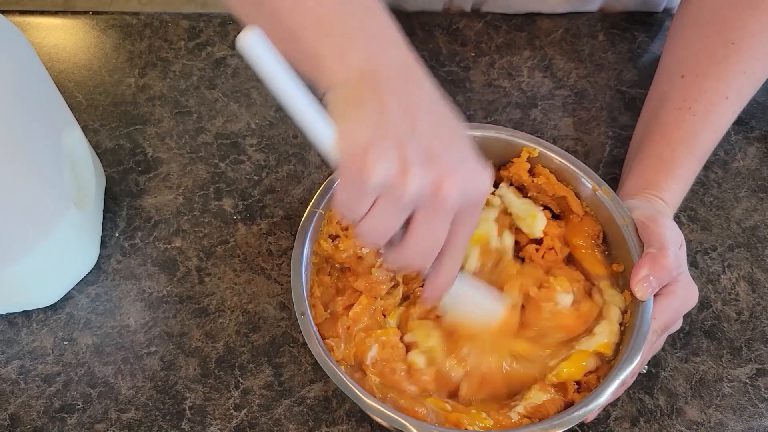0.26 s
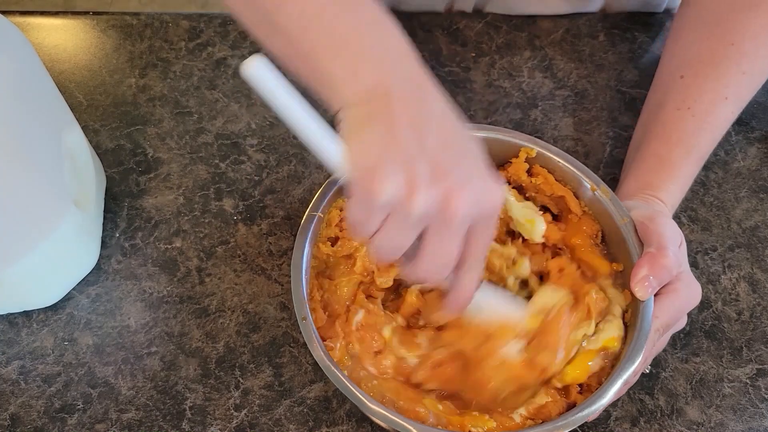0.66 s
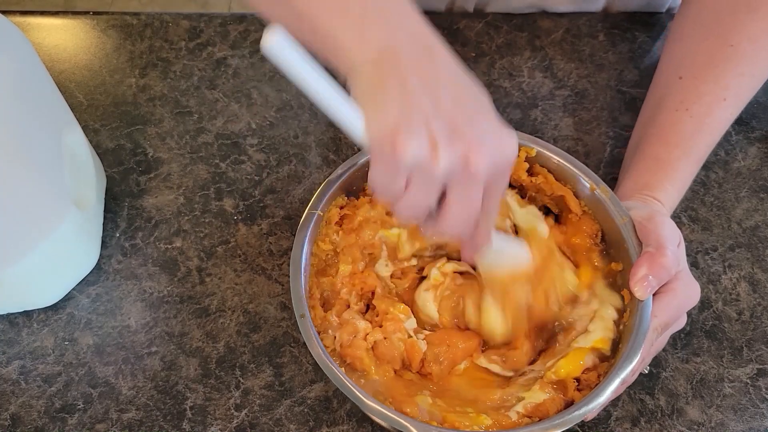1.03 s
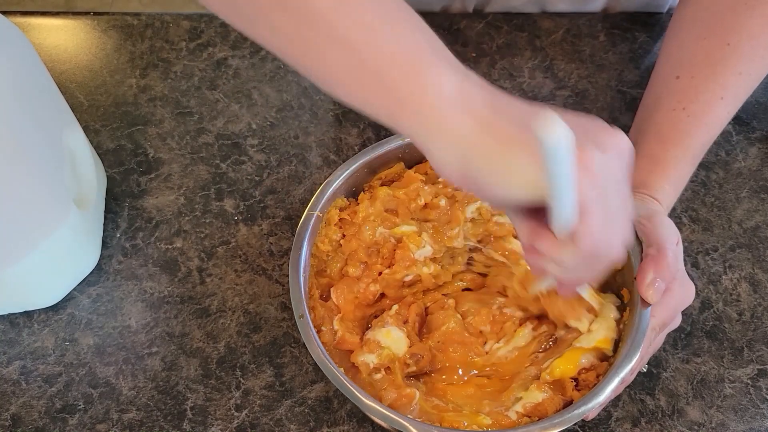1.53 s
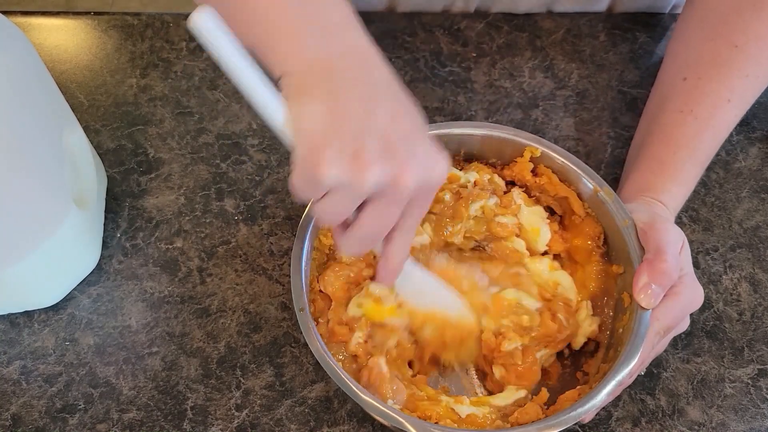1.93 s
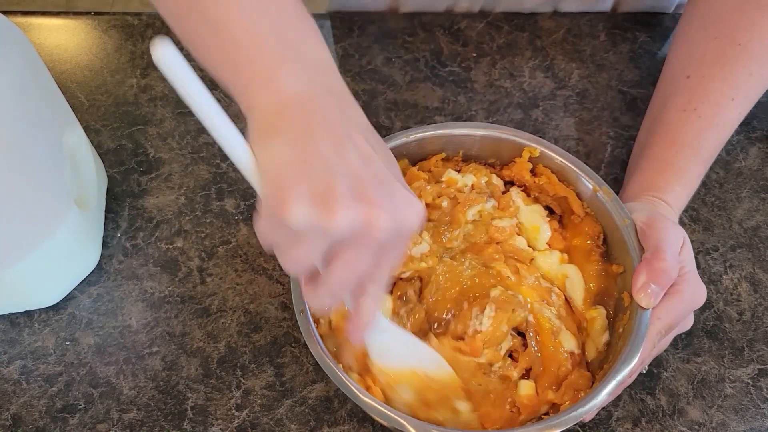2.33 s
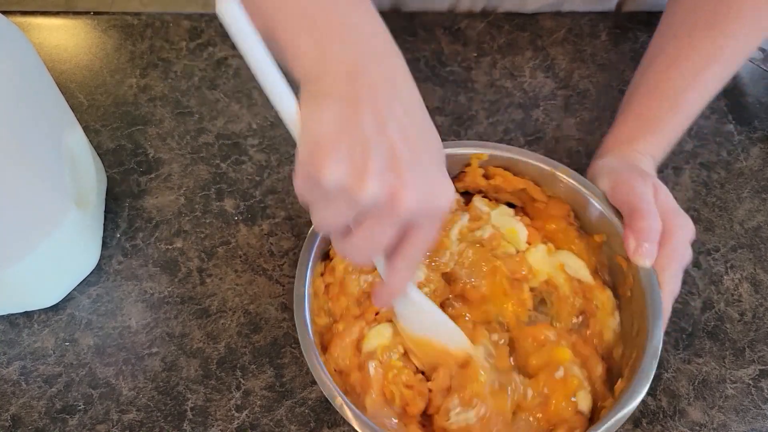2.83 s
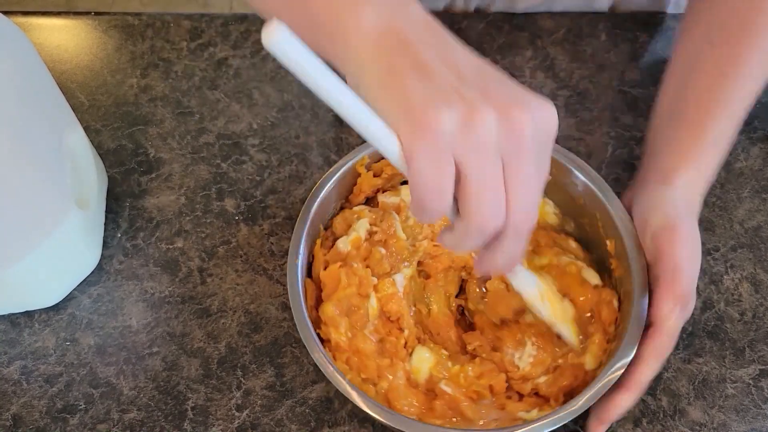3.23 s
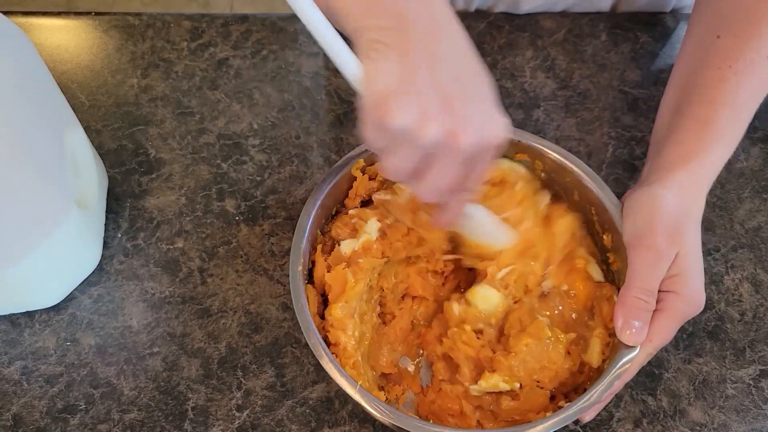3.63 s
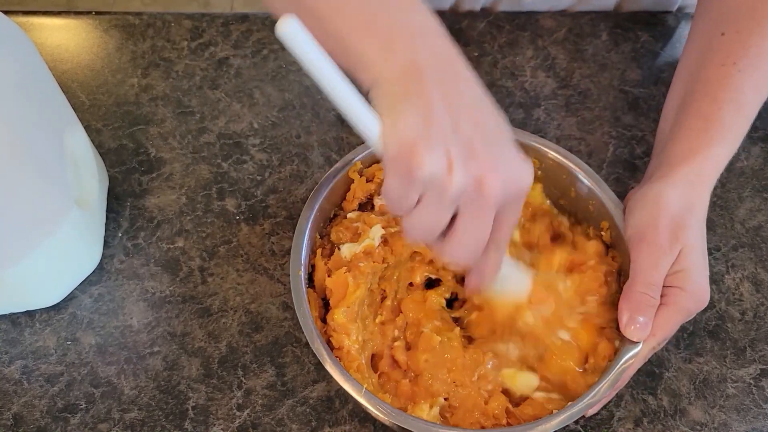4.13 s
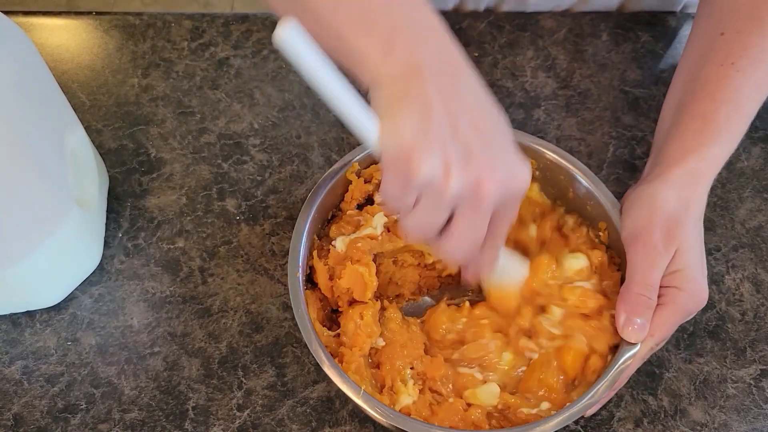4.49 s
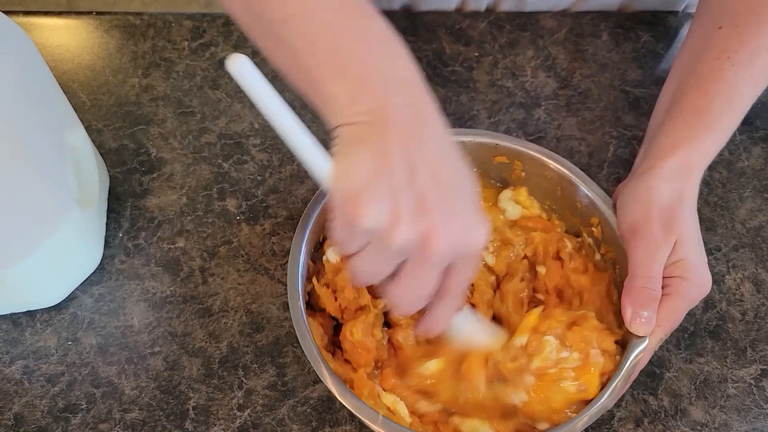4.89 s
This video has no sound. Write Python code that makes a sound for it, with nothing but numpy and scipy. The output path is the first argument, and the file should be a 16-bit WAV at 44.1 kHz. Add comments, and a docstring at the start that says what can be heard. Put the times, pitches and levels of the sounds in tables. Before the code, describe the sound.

Wet mashed sweet potato is stirred briskly in a metal bowl, with sticky squelches, slaps, pops and crackles and a few dull bowl bumps.

```python
"""Wet mashed sweet potato, stirred in a hand-held steel bowl, squelches as swarms of small cavities ring at random.
Each drag of the plastic spatula swells the swarm; wet films tear in a crackle of broad ticks.
Pops, bright film ticks, blade slaps and their echoes are each a snap with a short damped sine; hollows ring and glide.
Smooth force pulses, as dull bumps on the counter and hard strikes of the blade, ring the steel; shaped noise rumbles.
Bowl echoes, treble scatter and a small kitchen's decaying noise tail answer, above a quiet noise floor."""
import sys
import numpy as np
from scipy import signal
from scipy.fft import rfft, irfft
from scipy.io import wavfile

SR = 44100
rng = np.random.default_rng(int(sys.argv[2]) if len(sys.argv) > 2 else 0)


def store_wav(level_fs):
    """Save 16-bit WAV to argv[1]."""
    pcm = np.round(np.clip(np.atleast_2d(level_fs), -1, 1) * 32767)
    wavfile.write(sys.argv[1], SR, pcm.T.astype(np.int16))


N = 227291

# Effort of working the mash, as the level of its creep between drags: t/s, level/dB
EFFORT = [(0.0, -51), (0.24, -54), (0.4, -56), (0.66, -52), (1.13, -50), (1.32, -55), (1.59, -63.5),
          (2.25, -56), (2.42, -59), (2.94, -53), (3.13, -58), (3.36, -64.5), (3.49, -60), (3.87, -54.5),
          (4.12, -52), (4.22, -54.5), (4.78, -50), (5.15, -51)]
# Drags of the blade that loosen a lump: t/s, length/s, squelch level/dB, typical pocket f/Hz, crackle level/dB
DRAGS = [(0.193, 0.042, -55.5, 2370, -56), (0.23, 0.095, -51, 1090, -65), (0.422, 0.058, -53.5, 1470, -69),
         (0.567, 0.063, -53.5, 1240, -59), (0.65, 0.063, -53.5, 930, -62),
         (0.85, 0.079, -51.5, 1790, -61.5), (1.018, 0.046, -48, 1120, -80),
         (1.114, 0.019, -47.5, 2000, -69), (1.232, 0.039, -48, 1020, -79), (1.434, 0.094, -59.5, 2540, -74),
         (1.68, 0.1, -65.5, 1150, -74), (1.755, 0.012, -79, 2410, -54.5),
         (1.812, 0.037, -59.5, 1880, -60.5), (1.978, 0.088, -66, 2960, -59),
         (2.204, 0.088, -51.5, 1640, -55.5), (2.393, 0.15, -67, 3500, -54), (2.512, 0.23, -56, 1270, -68.5),
         (2.967, 0.038, -59, 1220, -53.5), (3.307, 0.062, -48.5, 1920, -59), (3.371, 0.075, -63, 640, -61),
         (3.449, 0.16, -63.5, 2020, -59.5), (3.665, 0.049, -52, 1200, -61), (3.846, 0.026, -58, 2230, -86),
         (3.995, 0.085, -55, 1000, -59.5), (4.137, 0.018, -47.5, 1260, -85),
         (4.276, 0.028, -47.5, 960, -56), (4.335, 0.14, -54.5, 1270, -54.5),
         (4.622, 0.074, -50.5, 1220, -59), (4.715, 0.098, -52, 2160, -55.5), (4.82, 0.02, -53, 1300, -75),
         (4.961, 0.026, -44.5, 1430, -56)]
# Colour of the pockets, as relative level per octave: f/Hz, level/dB
POCKET_COLOUR = [(300, -8.5), (560, -20.5), (680, 5), (820, 3.5), (1300, 2.5), (1800, 2.5), (2200, -4.5),
                 (3200, 9), (5000, -10.5), (9000, -4), (15500, -36)]
# Colour of the pockets that open while films tear, as relative level per octave: f/Hz, level/dB
FILM_COLOUR = [(300, -32), (1500, -32), (3000, 3), (5000, 9.5), (9500, 8.5), (11800, -6.5), (15500, 6.5)]
# Pops, bright film ticks, blade slaps and their echoes: t/s, damped sine level/dB, nominal f/Hz, snap level/dB
SNAPS = [(.189, -33, 475, -26.5), (0.189, -29.5, 2770, -31), (.213, -38, 2430, -20.5),
         (.254, -33.5, 920, -35), (.283, -34, 4480, -16.5), (.35, -31, 3480, -39), (.404, -29, 1400, -22),
         (.439, -28, 1550, -35), (.501, -32.5, 1060, -21), (0.514, -28.5, 2740, -42),
         (.536, -23.5, 9200, -34), (.593, -18, 1550, -16), (.708, -33, 830, -24.5),
         (.817, -28, 1510, -20.5), (.818, -30, 2740, -45), (1.052, -20.5, 1270, -23),
         (1.054, -25, 3020, -37), (1.062, -30.5, 870, -40), (1.125, -29, 845, -19.5),
         (1.137, -37, 810, -15.5), (1.154, -32.5, 1950, -35), (1.217, -33.5, 3340, -51),
         (1.257, -27, 1000, -47), (1.287, -29, 820, -36), (1.298, -26, 1600, -26),
         (1.329, -30.5, 3940, -36), (1.469, -32, 1780, -26.5), (1.657, -37, 1140, -27.5),
         (1.837, -30, 1920, -26), (1.901, -35, 2210, -22), (2.042, -41, 2800, -23.5),
         (2.178, -27.5, 1030, -25.5), (2.42, -23.5, 5860, -25), (2.468, -36.5, 955, -42),
         (2.504, -26, 3540, -47), (2.555, -34, 524, -29), (2.596, -31.5, 2600, -42),
         (2.667, -31, 1100, -35), (2.71, -29, 3470, -38), (2.909, -32.5, 3930, -24.5),
         (2.974, -27.5, 1030, -21), (3.001, -28, 5400, -15.5), (3.016, -27, 1390, -23),
         (3.094, -37.5, 910, -31), (3.101, -30, 4500, -44), (3.3157, -22.5, 1590, -16),
         (3.315, -22, 4570, -27), (3.322, -19, 6500, -40), (3.341, -16.5, 1910, -10),
         (3.3415, -29.5, 653, -35), (3.348, -23, 1910, -38), (3.38, -36.5, 610, -50),
         (3.431, -41.5, 617, -50), (3.477, -34, 1310, -34), (3.528, -26, 8900, -31),
         (3.591, -25.5, 10000, -26), (3.6, -28, 7340, -25.5), (3.639, -27, 7050, -27),
         (3.66, -33.5, 3400, -15), (3.688, -22, 1220, -20.5), (3.833, -36, 2060, -27.5),
         (3.873, -35, 2030, -40), (3.915, -25, 3220, -20.5), (4.015, -33.5, 700, -22),
         (4.109, -28, 2450, -17), (4.141, -26.5, 895, -22), (4.167, -36.5, 780, -35),
         (4.255, -34.5, 850, -16), (4.269, -22, 1030, -26), (4.331, -30, 1520, -26),
         (4.353, -30, 3700, -11), (4.365, -33, 770, -45), (4.438, -34, 840, -24), (4.556, -23, 1070, -25),
         (4.573, -21.5, 1300, -25), (4.634, -29.5, 807, -21), (4.641, -33, 794, -35),
         (4.761, -43, 3800, -30), (4.822, -23.5, 1530, -40), (4.873, -31.5, 1780, -33),
         (4.947, -26.5, 3180, -17), (5.047, -23, 3600, -27)]
# Hollows behind the blade that sing: t/s, length/s, level/dB, first f/Hz, last f/Hz
HOLLOWS = [(0.249, 0.076, -53.5, 1210, 1290), (1.066, 0.059, -51, 1180, 1130),
           (1.092, 0.048, -55, 766, 860), (1.277, 0.016, -51, 1440, 1620),
           (3.346, 0.048, -48.5, 1915, 1775), (4.157, 0.012, -55, 1680, 1410),
           (4.276, 0.027, -58, 1190, 1050), (4.379, 0.11, -56, 1440, 1603), (4.682, 0.03, -55, 925, 850),
           (4.83, 0.046, -58, 1870, 1800), (4.976, 0.021, -60, 1020, 1145)]
# Knocks of the bowl, dull bumps on the counter and hard strikes of the blade on its wall:
# t/s, level/dB, rocking f/Hz, contact length/s
KNOCKS = [(.104, -40, 74, 0.01), (.118, -32.5, 74, .011), (.19, -37, 90, 0.0011), (.213, -50, 190, 0.0026),
          (.511, -36.5, 81.6, 0.0087), (.593, -32.5, 180, 0.0032), (.622, -45, 181, 0.0025),
          (0.799, -46.5, 178, 0.0037), (1.026, -47.5, 144, 0.0031), (2.181, -35, 125, 0.0069),
          (2.205, -46.5, 159, 0.0031), (2.253, -45.5, 162, 0.0063), (2.554, -42, 181, 0.002),
          (2.586, -53, 180, 0.0026), (3.18, -29.5, 91, 0.0081), (3.204, -59, 180, 0.0027),
          (3.341, -48, 96, 0.00072), (3.378, -27, 102, 0.0072), (3.408, -47, 165, 0.0043),
          (3.638, -38, 81, 0.0077), (3.717, -47, 175, 0.0038), (4.016, -49.5, 114, 0.0014),
          (4.143, -40, 89, 0.0072), (4.267, -38.5, 90, 0.0061), (4.907, -47, 185, .0046)]
# Modes of the steel wall, damped by the mash: f/Hz, level/dB, t60/s
BOWL_MODES = [(180, -0.5, 0.075), (220, -20.5, 0.45), (288, 7, 0.0093), (369, -9.5, 0.11),
              (508, -15.5, 0.043), (640, -16, 0.084), (836, -12, 0.062), (1197, -19.5, 0.22),
              (1410, -30, .1), (1496, -24, 0.087), (1890, -18, 0.14), (2308, -16.5, .1), (2960, -28, .07)]
# Relative spectrum of the bowl's rumble: f/Hz, level/dB
RUMBLE_COLOUR = [(25, -17), (50, -10.5), (90, 6.5), (130, -3.5), (180, 2.5), (260, -15.5), (370, -8),
                 (600, -38), (1200, -72), (16000, -85)]
# Decay time of the kitchen: f/Hz, t60/s
KITCHEN_T60 = [(100, 0.24), (1000, 0.18), (4000, 0.093), (15000, 0.21)]
# Relative spectrum of the quiet background: f/Hz, level/dB
QUIET_COLOUR = [(15, -29), (25, -10), (204, -19), (260, -21), (399, -17), (648, -24), (1170, -27),
                (1300, -23.5), (1900, -27), (15500, -64)]

CREEP_SQUELCH_DB, CREEP_CRACKLE_DB = -5.5, -10.5   # relative to the effort
DRAG_ATTACK_S, DRAG_RELEASE_DB_PER_S = 0.029, 313
POCKETS_PER_S, POCKET_RISE = 105, .08   # openings of each size near 1 kHz; share by which pitch rises
CLUMP_DB, WANDER_DB = 1.3, 1.5   # spread of the clumping in time; spread of each size's level
SPATTER_DB, SPATTER_S = -25, 0.0029   # relative to the damped sine's level; decay of power to 1/e
ROCK_T60_S = .065
RUMBLE_DB, RUMBLE_FOLLOWS = -66, 0.52   # at the mean squelch level; share of its swing in dB
STROKES_PER_S = 2.6
QUIET_DB = -69
CUTOFF_HZ = 16050


def from_db(db):
    """Amplitude gain is ten to the power of level/20."""
    return 10 ** (np.asarray(db) / 20)


def rms_one(x):
    """Division by the root mean square normalises a signal's power."""
    return x / np.sqrt(np.mean(x ** 2) + 1e-20)


def at_hz(points, hz):
    """Equal frequency ratios are equal steps: interpolation on a logarithmic axis."""
    known, values = np.transpose(points)
    return np.interp(np.log(np.maximum(hz, 1)), np.log(known), values)


def shares(level_db):
    """Powers are additive: relative levels divide a power of 1 among the pocket sizes."""
    power = from_db(level_db) ** 2
    return power / power.sum()


def cut(x, hz, kind, order=2):
    """A causal Butterworth filter has a maximally flat passband."""
    sections = signal.butter(order, np.clip(hz, 10, .48 * SR), kind, fs=SR, output="sos")
    return signal.sosfilt(sections, x + 1e-18)


def drift(rate_hz):
    """White noise through a two-pole lowpass varies slowly, with rms 1."""
    step = 40   # samples between computed points
    pole = np.exp(-2 * np.pi * step * rate_hz / SR)
    noise = rng.standard_normal(N // step + 2002)
    slow = signal.lfilter([1], [1, -2 * pole, pole ** 2], noise)[2000:]   # skip the filter's start
    return np.interp(np.arange(N) / step, np.arange(len(slow)), rms_one(slow))


def ring(force, hz, t60):
    """A resonator answers a unit impulse with an exponentially damped sine."""
    radius, angle = np.exp(-np.log(1000) / (t60 * SR)), 2 * np.pi * hz / SR
    return signal.lfilter([0, np.sin(angle)], [1, -2 * radius * np.cos(angle), radius ** 2], force + 1e-18)


def add(track, s, sound):
    """Linear superposition: a short sound joins a track at time s."""
    start = max(round(s * SR), 0)
    track[start:start + len(sound)] += sound[:N - start]


def coloured_noise(spectrum, side_db):
    """Spectral weighting colours white noise; independent mid and side set its stereo width. Rms 1."""
    gain = from_db(at_hz(spectrum, np.arange(N // 2 + 1) * SR / N))
    mid, side = irfft(rfft(rng.standard_normal((2, N))) * gain, N)
    return rms_one(mid + from_db(side_db) * side * np.array([[1], [-1]]))


def stirring(pitches, squelch, tearing, tick_db=-3):
    """Incoherent superposition: swarms of small pockets open while wet films tear into a fine crackle."""
    power = squelch + np.outer(shares(at_hz(FILM_COLOUR, pitches)), tearing)
    clumping = from_db(CLUMP_DB * drift(50))
    swarm = np.zeros(N)
    for hz, size_power in zip(pitches, power):
        level = np.sqrt(size_power) * from_db(WANDER_DB * drift(10.2))
        per_s = POCKETS_PER_S * (hz / 1000) ** .4   # small pockets are more numerous than large ones
        swarm += level * pockets(hz, per_s, cycles=10.6, spread_db=4.5, clumping=clumping)
    return swarm + from_db(tick_db) * np.sqrt(tearing) * film_ticks()


def mash_power(pitches, focus_db=7):
    """Powers add: steady creep, plus for each drag a swarm around one pocket size and a burst of tearing."""
    effort_db = np.interp(np.arange(N) / SR, *np.transpose(EFFORT))
    colour_db = at_hz(POCKET_COLOUR, pitches)
    squelch = np.outer(shares(colour_db), from_db(effort_db + CREEP_SQUELCH_DB) ** 2)
    tearing = from_db(effort_db + CREEP_CRACKLE_DB) ** 2
    swells, swarms, crackles = [], [], []
    for start, length, squelch_db, pitch_hz, crackle_db in DRAGS:
        octaves_off = np.abs(np.log2(pitches / pitch_hz))
        swells.append(drag_swell(start, length) ** 2)
        swarms.append(from_db(squelch_db) ** 2 * shares(colour_db - focus_db * octaves_off))
        crackles.append(from_db(crackle_db) ** 2)
    swells = np.array(swells)
    return squelch + np.transpose(swarms) @ swells, tearing + np.array(crackles) @ swells


def drag_swell(start, length):
    """Friction builds up, holds while the lump slides, and dies away exponentially as the mash settles."""
    age = np.arange(N) / SR - start
    attack = np.clip(age / DRAG_ATTACK_S + .5, 0, 1)
    return attack * from_db(-np.clip(DRAG_RELEASE_DB_PER_S * (age - length), 0, 100))


def pockets(hz, per_s, cycles, spread_db, clumping):
    """Random arrivals, in clumps: cavities of one size each give a short rising blip. Rms 1."""
    born = np.flatnonzero(rng.random(N) < per_s * clumping / SR)
    size, sign = rng.random((2, 4000))[:, :len(born)]
    born, clicks = born[:len(size)], np.zeros(N)
    clicks[born] = from_db(spread_db * np.minimum(-np.log(size), 3)) * np.sign(sign - .5)
    blips = signal.oaconvolve(clicks * np.sqrt(clumping), rising_blip(hz, cycles, POCKET_RISE))[:N]
    return rms_one(cut(blips, hz * 0.53, "high"))


def rising_blip(hz, cycles, rise):
    """A damped resonance loses 60 dB over about the given cycles; a pocket's pitch rises as its mouth widens."""
    t = np.arange(SR // 20) / SR
    age = t * hz / cycles
    phase = 2 * np.pi * np.cumsum(hz * (1 + rise * (np.minimum(age, 1) - .25))) / SR
    onset = 1 - np.exp(-t * hz * 4)
    return np.sin(phase) * np.exp(-np.log(1000) * age) * onset


def film_ticks(per_s=75, spread_db=14.5, low_hz=3000, high_hz=15500):
    """Short impulses have broad spectra: strands part in ticks, most tiny and a few prominent. Rms 1."""
    sizes = from_db(spread_db * np.minimum(rng.exponential(1, N), 2.5)) * rng.choice([-1, 1], N)
    ticks = sizes * (rng.random(N) < per_s / SR)
    return rms_one(cut(ticks, [low_hz, high_hz], "band", order=1))


def pops_ticks_and_slaps(cycles=11.0, rise=0.051, snap_s=0.0023, shred_db=-15):
    """Impulsive excitation: each pop, film tick, slap or echo is a noisy snap with a short damped sine."""
    out, t = np.zeros(N), np.arange(SR // 20) / SR
    noises = rng.standard_normal((len(SNAPS), len(t)))
    for (s, sine_db, hz, snap_db), noise in zip(SNAPS, noises):
        click = (t == 0) + from_db(shred_db) * noise * np.exp(-t / snap_s)
        snap = cut(cut(click, 1370, "high", order=1), 5900, "low")
        add(out, s, from_db(sine_db) * rising_blip(hz, cycles, rise) + from_db(snap_db) * snap)
    return cut(out, 370, "high")


def spatter(pitches, focus_db=4):
    """Exponential decay of power: a brief spray of small pockets follows each snap, mostly near its pitch."""
    power, t = np.zeros((len(pitches), N)), np.arange(SR // 20) / SR
    for s, sine_db, hz, snap_db in SNAPS:
        octaves_off = np.abs(np.log2(pitches / hz))
        sizes = shares(at_hz(POCKET_COLOUR, pitches) - focus_db * octaves_off)
        start = round(s * SR)
        spray = from_db(sine_db + SPATTER_DB) ** 2 * np.exp(-t / SPATTER_S)
        power[:, start:start + len(t)] += np.outer(sizes, spray)
    return power


def hollows(slips_per_s=700, width_hz=190):
    """Stick-slip excitation: tiny slips off the blade ring the damped hollow behind it, whose pitch glides."""
    out, t = np.zeros(N), np.arange(SR // 4) / SR
    for start, length, level_db, first_hz, last_hz in HOLLOWS:
        slips = rng.standard_normal(len(t)) * (rng.random(len(t)) < slips_per_s / SR)
        glide_hz = np.interp(t, [0, length], [first_hz, last_hz])
        turn = np.exp(2j * np.pi * np.cumsum(glide_hz) / SR)
        # a one-pole filter in the frame that turns with the pitch is a gliding resonator
        envelope = signal.lfilter([1], [1, -np.exp(-np.pi * width_hz / SR)], slips / turn + 1e-18)
        fade_db = DRAG_RELEASE_DB_PER_S * np.maximum(t - length, 0)
        add(out, start, rms_one(np.real(turn * envelope)) * from_db(level_db - fade_db))
    return out


def knocks(snapping, coupling_db=-36):
    """Modal excitation: contacts with counter or blade rock the bowl; they and the snaps ring its steel."""
    force, rocking, t = from_db(coupling_db) * snapping, np.zeros(N), np.arange(SR // 4) / SR
    for s, level_db, rock_hz, contact_s in KNOCKS:
        push = np.sin(np.pi * np.minimum(t / contact_s, 1)) ** 2
        push *= from_db(level_db) / push.sum()
        add(force, s, push)
        add(rocking, s, ring(push, rock_hz, ROCK_T60_S))
    wall = np.zeros(N)
    for k, (hz, db, t60) in enumerate(BOWL_MODES):
        wall += from_db(db) * ring(force, hz, t60) * (-1) ** k   # modes alternate in sign
    return cut(rocking + wall, 66.4, "high", order=4)


def shaking(squelch, uneven_db=2.5):
    """Forced vibration: the rumble follows the push of the blade, unevenly as the mash yields in lumps."""
    push_db = 10 * np.log10(squelch.sum(axis=0))
    level_db = RUMBLE_DB + RUMBLE_FOLLOWS * (push_db - push_db.mean()) + uneven_db * drift(22.0)
    return from_db(level_db) * coloured_noise(RUMBLE_COLOUR, side_db=-13)


def direct_path(x, lag_s=.00007, left_db=-7, left_treble_db=-8):
    """Interaural differences: the circling blade shifts arrival on the left; the right is nearer and louder."""
    n = np.arange(N)
    # the treble is more even between the sides
    left = from_db(left_db) * x + from_db(left_treble_db) * cut(x, 5900, "high", order=1)
    lag = lag_s * SR * np.sin(2 * np.pi * STROKES_PER_S * n / SR)
    return np.array([np.interp(n - lag, n, left), x])


def bowl_echoes(x, first_s=0.00038, t60=0.028, echo_db=-3.0, count=5):
    """Multiple reflection between steel walls; the pattern keeps changing as blade and mash move."""
    t = np.arange(SR // 20) / SR
    echoes = rng.standard_normal((count, 2, len(t))) * np.exp(-np.log(1000) * t / t60) * (t > first_s)
    echoes /= np.sqrt(np.sum(echoes ** 2, axis=2, keepdims=True))
    weights = np.array([drift(44.4) for pattern in echoes])
    weights /= np.sqrt(np.sum(weights ** 2, axis=0))
    reflected = signal.oaconvolve(x[None, None], echoes, axes=2)[..., :N]
    return from_db(echo_db) * np.sum(weights[:, None] * reflected, axis=0)


def wall_scatter(x, above_hz=2200, scatter_db=-6, t60=0.0087):
    """Diffuse scattering: lumps and the curved wall spread the treble differently towards each side."""
    t = np.arange(SR // 50) / SR
    paths = rng.standard_normal((2, len(t))) * np.exp(-np.log(1000) * t / t60)
    paths /= np.sqrt(np.sum(paths ** 2, axis=1, keepdims=True))
    treble = cut(x, above_hz, "high")
    return from_db(scatter_db) * signal.oaconvolve(treble[None], paths, axes=1)[:, :N]


def kitchen(x, first_s=0.006):
    """Reverberation: bands of diffuse noise decay exponentially, each with its own decay time."""
    t, edges = np.arange(SR // 2) / SR, np.geomspace(50, 17000, 9)
    tail = np.zeros((2, len(t)))
    for low, high in zip(edges, edges[1:]):
        t60 = at_hz(KITCHEN_T60, np.sqrt(low * high))
        band = cut(rng.standard_normal((2, len(t))), [low, high], "band")
        tail += band * np.exp(-np.log(1000) * t / t60)
    tail *= t > first_s
    return signal.fftconvolve(x[None], tail / np.sqrt(np.sum(tail ** 2) / 2), axes=1)[:, :N]


def quiet_background():
    """Stationary noise: a faint, wide floor lies under everything."""
    return from_db(QUIET_DB) * coloured_noise(QUIET_COLOUR, side_db=1.5)


def scene():
    """Superposition of direct sound, structure-borne sound, reflections and background, a little to the right."""
    pitches = np.geomspace(330, 15300, 30)   # pocket sizes, as Hz
    squelch, tearing = mash_power(pitches)
    snapping = pops_ticks_and_slaps()
    wet = stirring(pitches, squelch + spatter(pitches), tearing) + snapping + hollows()
    knocking = knocks(snapping)
    direct = from_db(-2.5) * direct_path(wet)
    body = (knocking + shaking(squelch)) * from_db([[-1.2], [1.3]])   # left, right
    echoes = bowl_echoes(wet) * from_db([[-1.2], [.8]]) + wall_scatter(wet)
    room = kitchen(from_db(-6.5) * wet + from_db(-10.0) * knocking)
    return direct + body + echoes + room + quiet_background()


def record(dry):
    """Band limitation: an elliptic lowpass cuts the top steeply."""
    return signal.sosfilt(signal.ellip(10, .2, 70, CUTOFF_HZ, fs=SR, output="sos"), dry)


dry = scene()
out = record(dry)
store_wav(out)
```